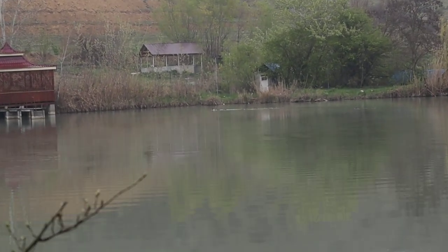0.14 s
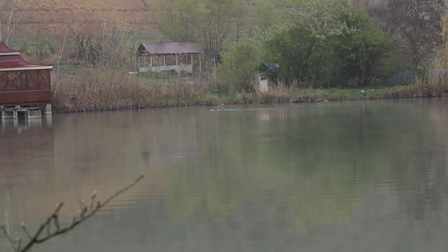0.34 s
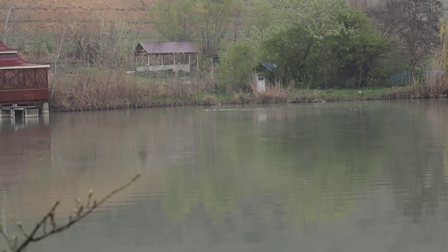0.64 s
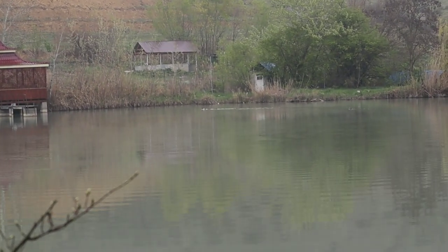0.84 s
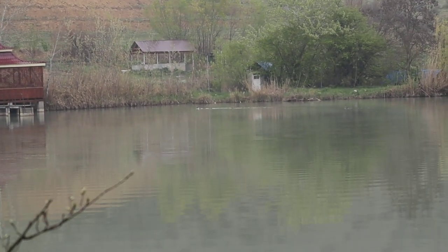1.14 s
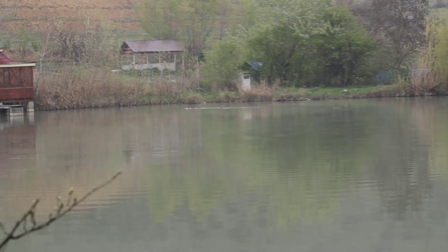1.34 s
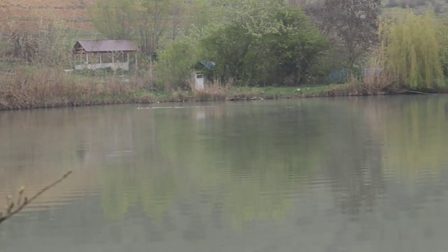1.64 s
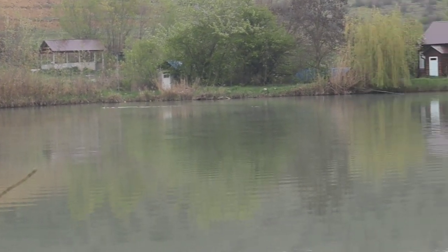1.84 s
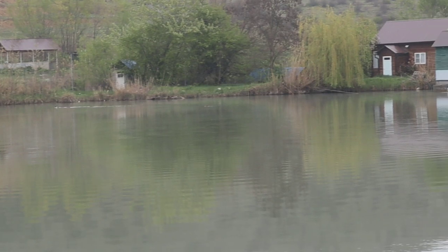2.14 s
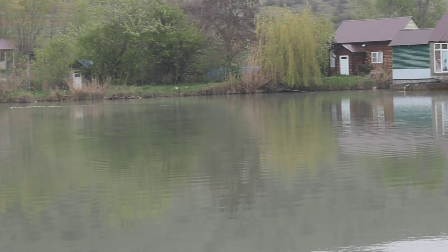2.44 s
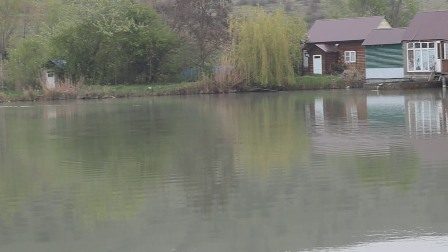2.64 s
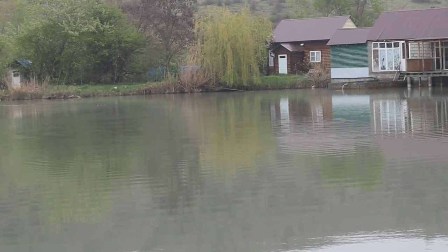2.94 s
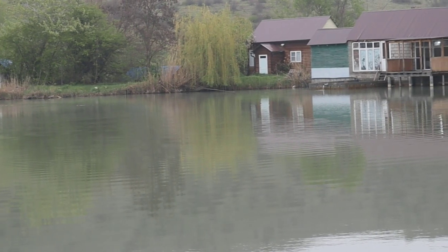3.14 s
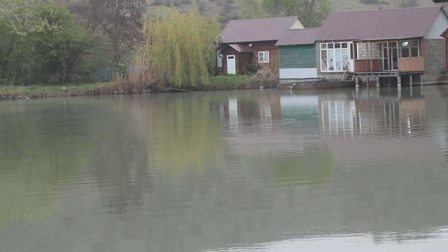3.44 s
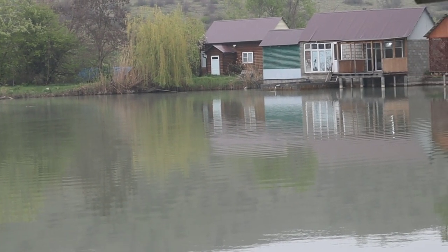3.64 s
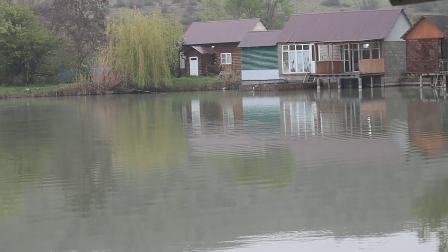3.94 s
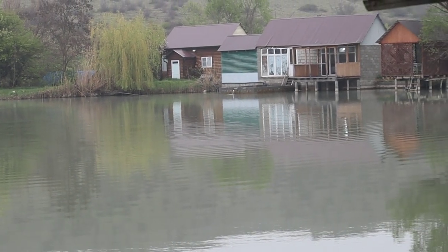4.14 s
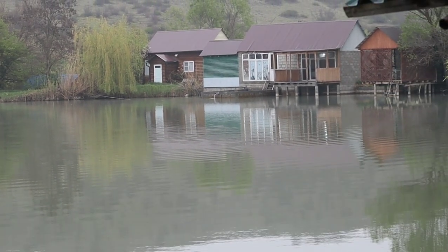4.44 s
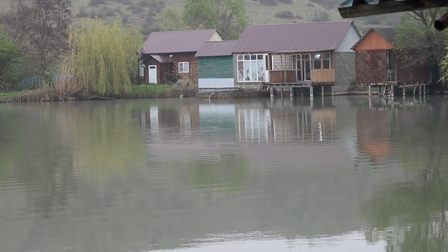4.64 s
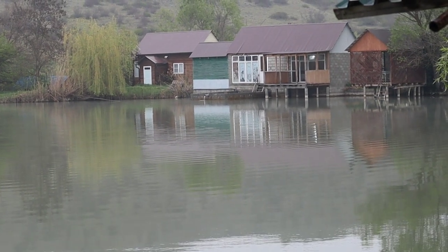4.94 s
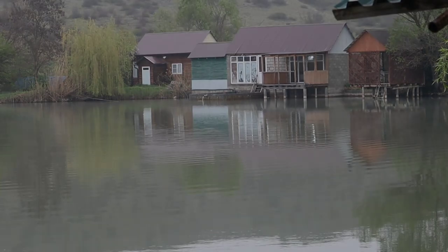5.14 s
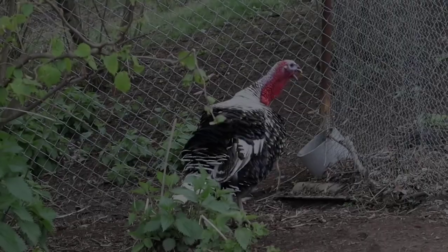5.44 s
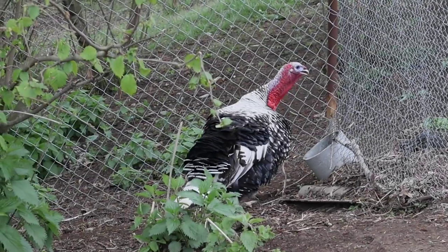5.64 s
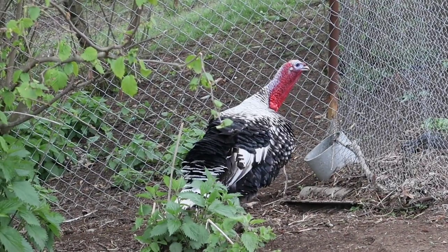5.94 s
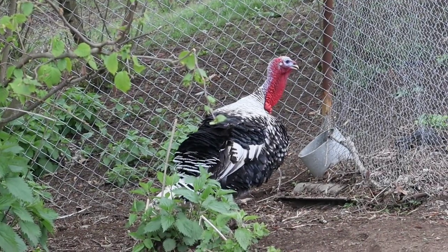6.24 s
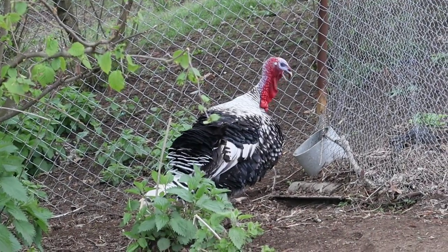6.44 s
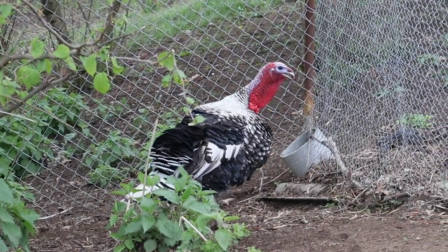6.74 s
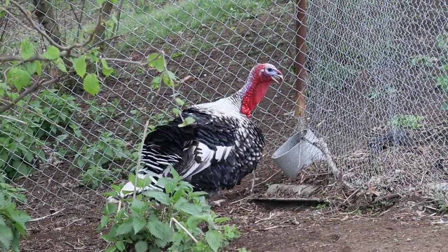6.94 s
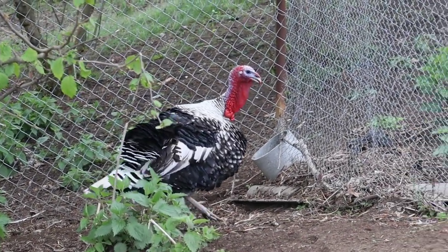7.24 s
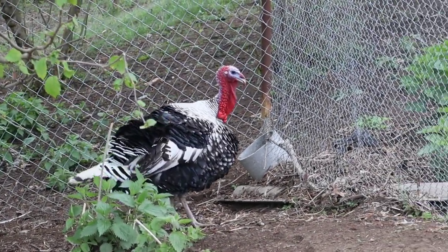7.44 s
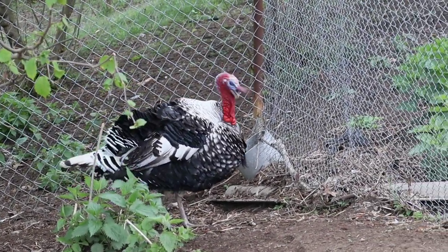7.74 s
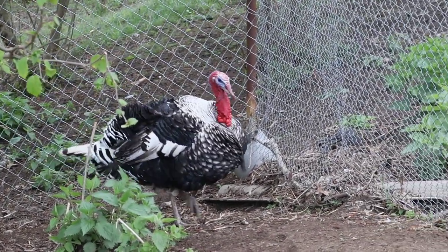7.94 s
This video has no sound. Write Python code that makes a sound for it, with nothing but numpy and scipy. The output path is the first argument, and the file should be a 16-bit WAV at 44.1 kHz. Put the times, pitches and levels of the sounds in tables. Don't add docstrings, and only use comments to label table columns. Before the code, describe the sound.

From 0 to about 5.3 seconds there is soft lakeside air, very quiet, on a hand-held camera. Four faint nasal duck quacks come in the first 1.1 seconds, among tiny high chirps and a dull knock at 0.3. Sparse chirps follow, with low handling bumps and a bright tick near 2.8. Two clearer distant quacks come at 3.2 and 3.6. From 4.65 a quick small-bird trill leads to a clear falling note at 4.9 and a higher note at 5.1 as the air fades. At 5.4 turkeys erupt close by: buzzy, whistling gobbles and a short yelp, rapid until 6.1. Low clucks follow at 6.2 and 6.3. A louder, rougher burst runs from 6.4 to 7.0, with a warbling yelp around 6.5, growls and peeps, slightly echoing. A soft purr and peeps end near 7.2, then faint pen air, dry ticks and low handling bumps until 8.

```python
import sys
import numpy as np
from scipy import signal
from scipy.fft import rfft, irfft, next_fast_len
from scipy.io import wavfile
from scipy.ndimage import uniform_filter1d

SR = 44100
rng = np.random.default_rng(int(sys.argv[2]) if len(sys.argv) > 2 else 0)


def transcribe(u):
    v = np.clip(np.atleast_2d(u).T, -1, 1)
    q = np.round(v * 32767).astype(np.int16)
    wavfile.write(sys.argv[1], SR, q)


def makeup_ratio(level_db):
    decades = np.asarray(level_db, float) / 20
    return 10 ** decades


N = 357121
T = np.arange(N) / SR
SCENE_CHANGE_S = 5.372

# f/Hz, width/Hz, level/dB
WINDPIPE = [(595, 145, -5), (1150, 112, -3), (1510, 870, -11), (2200, 620, -10), (2925, 97, -2),
            (3610, 71, -2.5), (4400, 255, -10), (5050, 73, -7), (5670, 96, -11), (6500, 290, -21),
            (7300, 240, -20.5), (8700, 610, -22.5), (12000, 3500, -35)]


def curve(rows):
    s, *columns = np.transpose(rows)
    return [np.interp(T, s, c) for c in columns]


def wander(hz):
    x = signal.lfilter(*signal.butter(2, hz, fs=SR), rng.standard_normal(N))
    return x / x.std()


def add(out, start_s, x):
    i = int(start_s * SR)
    out[i:i + len(x)] += x[:N - i]


def sine(hz):
    return np.sin(2 * np.pi * np.cumsum(hz) / SR)


def response(hz, throat):
    total = 0
    for k, (centre_hz, width_hz, db) in enumerate(throat):
        total = total + (-1) ** k * makeup_ratio(db) / (1 + 2j * (hz - centre_hz) / width_hz) ** 1.233
    return total


def ring(x, throat):
    hz = np.arange(2049) * SR / 4096
    radiation = (1j * hz / (140 + 1j * hz)) ** 3
    return signal.oaconvolve(x, irfft(response(hz, throat) * radiation))[:N]


def glide(length_s, first_hz, last_hz, bend, attack, edge):
    u = np.linspace(0, 1, int(length_s * SR))
    swell = np.where(u < attack, u / attack, (1 - u) / (1 - attack))
    hz = last_hz + (first_hz - last_hz) * (1 - u) ** bend
    return hz, np.sin(np.pi / 2 * swell) ** edge


def stack(start_s, hz, swell, throat, tilt_db, rough, shake, soft_db=4.5, half_db=-60, spread=0):
    i = int(start_s * SR)
    pitch_noise, size_noise, breath = shake[:, i:i + len(hz)]
    k = np.arange(1, int(17500 / hz.max()))[:, None]
    octave_db = tilt_db - soft_db * (1 - swell / swell.max())
    source = makeup_ratio(octave_db * np.log2(k))
    phase = 2 * np.pi * np.cumsum(hz * (1 + 0.26 * rough * pitch_noise)) / SR
    pulses = (source * np.cos(k * phase - spread * k ** 2)).sum(axis=0)
    pulses *= 1 + 0.9 * rough * size_noise
    pulses += makeup_ratio(half_db) * np.cos(phase / 2)
    top = (source * abs(response(k * hz, throat)))[:, np.argmax(swell)].max()
    return -swell * (pulses + rough * breath * (1 + np.cos(phase))) / top


def syllables(table, throat, shake, end, tilt_db, attack, edge, half_db=-60, soft_db=5.0, spread=0):
    out = np.zeros(N)
    for s, length_s, first_hz, db, rough in table:
        hz, swell = glide(length_s, first_hz, end * first_hz, 1.0, attack, edge)
        add(out, s, makeup_ratio(db) * stack(s, hz, swell, throat, tilt_db, rough, shake, soft_db, half_db, spread))
    return ring(out, throat)


def held(rows, throat, shake, tilt_db, soft_db, fall_db, rough):
    start_s = rows[0][0]
    span = (T > start_s) & (T < rows[-1][0])
    hz, db = (uniform_filter1d(c, size=220)[span] for c in curve(rows))
    swell = makeup_ratio(db) * signal.windows.tukey(len(hz), .15)
    soft_db = soft_db + fall_db * (1 - hz / np.maximum.accumulate(hz))
    out = np.zeros(N)
    out[span] = stack(start_s, hz, swell, throat, tilt_db, rough, shake, soft_db)
    return ring(out, throat)


def first_turkey(shake):
    # t/s, length/s, first f/Hz, level/dB, roughness/0-1
    gobble = [(5.366, 0.067, 676, -54.5, 0.4), (5.408, 0.026, 787, -35, 0.25),
              (5.463, 0.034, 765, -29, 0.36), (5.638, 0.027, 720, -25.5, 0.54),
              (5.694, 0.019, 729, -21, 0.4), (5.802, 0.022, 730, -18.5, 0.34),
              (5.856, 0.025, 713, -19, 0.28), (5.904, 0.037, 776, -40, 0.14),
              (6.004, 0.028, 751, -19, 0.33), (6.45, 0.015, 717, -22, 0.1),
              (6.588, 0.021, 780, -14.5, 0.16), (6.698, 0.016, 808, -17, 0.26),
              (6.749, 0.018, 772, -18, 0.38), (6.94, 0.023, 664, -11.5, 0.24)]
    return syllables(gobble, WINDPIPE, shake, end=.87, tilt_db=-5.5, attack=0.35, edge=1.44)


def second_turkey(shake):
    # t/s, length/s, first f/Hz, level/dB, roughness/0-1
    answer = [(5.776, 0.032, 524, -11.5, 0.34), (5.79, 0.013, 510, -15.5, 0.43),
              (5.812, 0.016, 518, -33, 0.53), (5.872, 0.012, 490, -24, 1), (5.983, 0.012, 550, -25.5, .17),
              (5.996, 0.017, 523, -11.5, 0.2), (6.022, 0.011, 496, -16, 0.073),
              (6.438, 0.025, 525.4, -15, 0.45), (6.466, 0.023, 548, -23, 0.44),
              (6.664, 0.014, 565, -19.5, 0.42), (6.76, 0.0076, 577, -22, 0.11),
              (6.764, 0.013, 287, -37, 0.12), (6.916, 0.0102, 516, -13, 0.15),
              (6.934, 0.015, 540, -15, 0.43), (6.961, 0.014, 546, -13, 0.51),
              (6.97, 0.011, 532, -19.5, 0.68)]
    growls = [
        (6.068, 0.026, 346.3, -18.5, 0.53),
        (6.422, 0.029, 314.2, -23, 0.48),
        (6.596, 0.038, 303, -14, 0.35),
        (6.62, 0.05, 275.8, -10.5, 0.24),
    ]
    # f/Hz, width/Hz, level/dB
    chest = [(282, 480, -58), (556, 890, -8), (1064, 156, 14), (1780, 190, 6), (2150, 120, 2),
             (2850, 240, -2), (3730, 530, -6), (4900, 230, -18), (6000, 1600, -21), (8700, 2600, -44),
             (12100, 2600, -33)]
    stretched = [(570, 600, -9), (1095, 115, 14), (1767, 200, -3), (2100, 200, -4), (3030, 100, 2),
                 (3600, 160, -8), (4430, 120, -3), (6300, 900, -18), (8700, 1500, -28), (12500, 2000, -33)]
    shake = np.roll(shake, SR, axis=1)
    out = syllables(answer, chest, shake, end=1.015, tilt_db=-6.5, attack=0.4, edge=0.49,
                    half_db=-4, soft_db=17)
    out += syllables(growls, stretched, shake, end=1.015, tilt_db=-2.5, attack=0.51, edge=0.54, spread=.05)
    return out


def peeps(shake):
    # t/s, first f/Hz, last f/Hz, level/dB, octave level/dB
    heads = [
        (5.397, 2150, 1187, -34, -11),
        (5.455, 2475, 1159, -25, -9),
        (5.491, 1510, 1290, -20.5, -8.5),
        (5.626, 1997, 1030, -23.5, -10),
        (5.683, 2515, 1162, -20.5, -23),
        (5.845, 1490, 984, -19.5, -13),
        (5.9, 2670, 1144, -15.5, -11.5),
        (5.913, 1406, 1194, -27, -6.5),
        (6.053, 2056, 954, -22, -7),
        (6.681, 1544, 1270, -19, -2),
    ]
    # t/s, length/s, first f/Hz, last f/Hz, level/dB
    between_peeps = [(5.481, 0.015, 995, 1185, -23), (5.656, 0.011, 1300, 1020, -26),
                     (5.875, 0.017, 1230, 1260, -31), (6.091, 0.028, 1860, 2200, -23),
                     (6.11, 0.016, 3010, 3020, -34.5), (6.441, .013, 1040, 1140, -15),
                     (6.448, 0.018, 1230, 1473, -15), (6.712, 0.013, 1140, 1080, -17),
                     (6.736, 0.014, 2600, 2410, -24.5), (6.744, .012, 1760, 1153, -14),
                     (6.966, 0.015, 986, 860, -16.5), (6.984, .024, 930, 900, -39),
                     (6.979, 0.033, 1436, 1500, -13), (7.158, 0.033, 1337, 1294, -25.5),
                     (7.178, 0.026, 1272, 1415, -24.5)]
    head_s, peep_octave_db = .028, -11
    third_db, overtone_fall_db = -5, -5
    rows = [(s, head_s, *rest) for s, *rest in heads]
    rows += [(*row, peep_octave_db) for row in between_peeps]
    out, upper = np.zeros((2, N))
    for s, length_s, first_hz, last_hz, db, octave_db in rows:
        width = abs(np.log(first_hz / last_hz))
        hz, swell = glide(length_s, first_hz, last_hz, bend=1 + 5.5 * width,
                          attack=.3 + .3 * width, edge=.9 + 1.1 * width)
        pitch_noise, size_noise, breath = shake[:, int(s * SR):][:, :len(hz)]
        phase = 2 * np.pi * np.cumsum(hz * (1 + 0.12 * width * pitch_noise)) / SR
        tone = np.sin(phase) + swell * makeup_ratio(octave_db) * np.sin(2 * phase)
        tone = tone * (1 + 0.098 * width * size_noise) + 0.14 * width * breath
        add(out, s, makeup_ratio(db) * swell * tone)
        overtones = sum(makeup_ratio(overtone_fall_db * k) * np.sin((k + 3) * phase) for k in range(4))
        add(upper, s, makeup_ratio(db + third_db) * width * swell * overtones)
    return 0.87 * out + ring(0.18 * out + 1.47 * upper, WINDPIPE)


def yelps(shake):
    # t/s, f/Hz, level/dB
    yelp = [
        (5.516, 725, -20.5),
        (5.535, 740, -21.5),
        (5.55, 762, -21),
        (5.576, 806, -22),
        (5.594, 760, -24),
        (5.602, 684, -23),
        (5.617, 630, -33),
    ]
    warble = [
        (6.478, 839, -22),
        (6.496, 924, -12),
        (6.512, 755, -14),
        (6.53, 892, -11.5),
        (6.545, 794, -13),
        (6.558, 853, -15),
        (6.572, 834, -13.5),
        (6.588, 1051, -5.5),
        (6.62, 970, -42),
    ]
    # f/Hz, width/Hz, level/dB
    open_beak = [(730, 470, 0), (1460, 126, 8.5), (2270, 600, 0.5), (3010, 280, 5.5), (3920, 440, -1),
                 (4860, 290, -6), (5430, 280, -8.5), (8000, 4000, -24), (15000, 4000, -35)]
    wide_beak = [(1040, 330, 9.5), (1616, 270, 9), (2400, 100, -3), (3460, 130, -5), (4080, 110, -9.5),
                 (5320, 370, -18), (8700, 240, -23), (12500, 1500, -61)]
    out = held(warble, wide_beak, shake, tilt_db=0.5, soft_db=-1.0, fall_db=4, rough=0.059)
    return out - held(yelp, open_beak, shake, tilt_db=1.5, soft_db=6, fall_db=120, rough=0.062)


def hen(shake):
    # t/s, length/s, first f/Hz, level/dB, roughness/0-1
    clucks = [
        (6.164, 0.03, 264, -23.5, 0.35),
        (6.286, 0.03, 269.2, -21.5, 0.35),
        (6.406, .0093, 258, -42, .4),
    ]
    purrs = [
        (6.842, 0.031, 206, -28.5, 0.15),
        (7.108, 0.031, 177.2, -30.5, 0.15),
    ]
    # f/Hz, width/Hz, level/dB
    hen_throat = [(373, 350, -9), (718, 197, 9), (2080, 280, -4), (2600, 71, -5.5), (3400, 280, -9),
                  (6700, 370, -22), (8150, 170, -20)]
    out = syllables(clucks, hen_throat, shake, end=.9, tilt_db=1.0, attack=0.33, edge=0.41)
    out += syllables(purrs, hen_throat, shake, end=.9, tilt_db=-1.0, attack=0.6, edge=0.92)
    return out


def breathing(voice, smear_s, db):
    flow = uniform_filter1d(abs(voice), size=int(smear_s * SR))
    return makeup_ratio(db) * ring(flow * rng.standard_normal(N), WINDPIPE)


def air_sac(voice):
    band = signal.butter(2, [58, 125], "band", fs=SR, output="sos")
    push = np.tanh(abs(voice) / 0.13) * 0.072
    return makeup_ratio(-3.5) * signal.sosfilt(band, push)


def ducks(shake):
    # t/s, length/s, first f/Hz, highest f/Hz, level/dB
    quacks = [
        (.132, .105, 280, 286, -47),
        (.378, .15, 264, 299, -45.5),
        (.67, .15, 291, 300, -45),
        (.975, .125, 264, 293, -45),
        (3.198, .165, 277, 338, -41),
        (3.566, .15, 270, 320, -41),
    ]
    # f/Hz, width/Hz, level/dB
    bill = [(1230, 240, -8), (1540, 240, -10), (2030, 200, 1), (2550, 350, -17)]
    roughness, sag = .05, .95
    out = np.zeros(N)
    for s, length_s, first_hz, top_hz, db in quacks:
        u = np.linspace(0, 1, int(length_s * SR))
        top = .15 + 3.2 * (top_hz / first_hz - 1)
        climb = first_hz + (top_hz - first_hz) * np.sin(np.pi / 2 * np.minimum(u / top, 1)) ** 1.9
        fall = top_hz * (1 - (1 - sag) * ((u - top) / (1 - top)) ** 2)
        hz = np.where(u < top, climb, fall)
        swell = glide(length_s, 1, 1, 1, attack=0.23, edge=0.11)[1]
        rough = roughness * (.5 + 2 * u)
        add(out, s, makeup_ratio(db) * stack(s, hz, swell, bill, tilt_db=-1, rough=rough, shake=shake))
    return ring(out, bill)


def birds(shake):
    # t/s, length/s, first f/Hz, level/dB
    chirps = [(.237, .009, 7300, -49), (.248, 0.018, 8600, -48.5), (.266, .008, 7000, -49),
              (.278, 0.025, 8250, -54), (.308, .008, 6200, -47), (.334, .007, 4400, -47),
              (.342, .006, 5740, -49), (.428, .008, 5100, -53), (1.652, 0.018, 8700, -53.5),
              (1.688, .013, 7050, -52), (2.328, 0.04, 8540, -59), (3.786, .04, 7800, -63),
              (4.942, 0.059, 8000, -59), (7.05, 0.035, 7800, -59)]
    level_notes = [
        (.04, .06, 7120, -59),
        (.1, .06, 6760, -61),
        (.386, .013, 4860, -52),
        (1.658, 0.02, 6880, -54),
        (.304, .006, 7600, -52),
        (6.3, 0.097, 4300, -58.5),
        (7.128, 0.09, 6000, -59),
    ]
    trill = [
        (4.731, 0.011, 2000, -49),
        (4.756, .012, 2060, -48),
        (4.782, 0.016, 2120, -46),
    ]
    rising = [
        (4.664, .011, 2450, -49),
        (4.682, 0.011, 2400, -47),
        (4.699, .014, 2400, -48),
        (4.721, 0.012, 2360, -50),
        (4.747, .013, 2370, -47),
        (4.868, 0.025, 2340, -44.5),
    ]
    out = np.zeros(N)
    for table, end, flutter in ((chirps, .76, .6), (level_notes, .995, .4), (trill, .86, .15),
                                (rising, 1.08, .15)):
        for s, length_s, first_hz, db in table:
            hz, swell = glide(length_s, first_hz, end * first_hz, 1.0, attack=0.38, edge=0.17)
            wobble = 1 + flutter * (-db - 32) / 16 * shake[int(s * SR):][:len(hz)]
            add(out, s, makeup_ratio(db) * swell * wobble * sine(hz * (1 + 0.011 * (wobble - 1))))
    return out


def songbird():
    # t/s, f/Hz, level/dB
    song_notes = [
        [(4.873, 1780, -52), (4.886, 2080, -42), (4.92, 2070, -40), (4.97, 1992, -40), (5.02, 1894, -42.5),
         (5.05, 1820, -48), (5.066, 1770, -49)],
        [(5.128, 3300, -60), (5.145, 3216, -47), (5.19, 3200, -43.5), (5.205, 3300, -50), (5.224, 3020, -53)],
        [(5.212, 2850, -56), (5.221, 2520, -49), (5.229, 2730, -56), (5.239, 2450, -52), (5.252, 2780, -51),
         (5.28, 2790, -60), (5.312, 2850, -68)],
    ]
    out, shiver = np.zeros(N), 1 + 0.21 * wander(90)
    for rows in song_notes:
        span = (T > rows[0][0]) & (T < rows[-1][0])
        hz, db = (uniform_filter1d(c, size=130)[span] for c in curve(rows))
        out[span] += makeup_ratio(db) * shiver[span] * signal.windows.tukey(len(hz), .1) * sine(hz)
    return out


def echoes(x, near, distant, top_hz):
    t, tail = T[:SR // 2], 0
    for delay_s, t60_s, db in (near, distant):
        shape = makeup_ratio(-60 * t / t60_s) * (1 - np.exp(-(t / delay_s) ** 2))
        tail = tail + makeup_ratio(db) * shape / np.linalg.norm(shape)
    scatter = signal.lfilter(*signal.butter(1, top_hz, fs=SR), tail * rng.standard_normal(len(t)))
    return x + signal.fftconvolve(x, scatter)[:N]


def ticks():
    # t/s, level/dB, f/Hz
    clicks = [
        (2.6304, -46, 2970),
        (2.762, -40, 2900),
        (2.8118, -30.5, 9000),
        (4.514, -35, 2450),
        (4.621, -35, 2900),
        (7.42, -36.5, 6100),
        (7.435, -38, 3210),
        (7.6819, -46, 3140),
        (7.9468, -37, 5170),
    ]
    # (f/Hz, level/dB, t60/s)
    knock_s, knock_db, modes = (.303, -31.5, [(261, 5, 0.11), (69.6, -9.5, .15)])
    out, t = np.zeros(N), T[:SR // 5]
    for s, db, hz in clicks:
        add(out, s, makeup_ratio(db + 5.0) * np.exp(-t / 0.00027) * np.cos(2 * np.pi * hz * t))
    for hz, db, t60_s in modes:
        swell = (1 - np.exp(-t / 0.0045)) * makeup_ratio(-60 * t / t60_s)
        add(out, knock_s, makeup_ratio(knock_db + db) * swell * np.sin(2 * np.pi * hz * t))
    return out


def rumble():
    # middle t/s, half length/s, level/dB
    jolts = [(0.297, 0.062, -57), (.65, 0.3, -55), (1.3, .25, -56), (1.697, 0.036, -50), (2.1, 0.073, -51),
             (2.32, 0.035, -56), (2.486, 0.042, -44), (2.64, 0.034, -45), (2.87, 0.081, -43.5),
             (3.18, .07, -57), (3.423, .05, -41), (3.82, 0.046, -56), (4.667, 0.085, -48),
             (6.25, 0.074, -52), (7.332, 0.074, -50), (7.54, 0.069, -39.5), (7.886, 0.11, -41)]
    resonance_hz, tremor_db = 26, -55.5
    gap = 1 - np.exp(-((T - SCENE_CHANGE_S) / 0.18) ** 2)
    size = makeup_ratio(tremor_db - 19 * (T > SCENE_CHANGE_S))
    for s, half_s, db in jolts:
        size = size + makeup_ratio(db) * np.exp(-((T - s) / half_s) ** 2)
    return np.sqrt(2) * gap * size * np.sin(2 * np.pi * resonance_hz * T + 0.53 * wander(3.7))


def air(spectrum, flicker_db):
    size = next_fast_len(N)
    f = np.maximum(np.arange(size // 2 + 1) * SR / size, 1)
    hz, db = np.transpose(spectrum)
    shaped = rfft(rng.standard_normal(size)) * makeup_ratio(np.interp(np.log(f), np.log(hz), db))
    out = 0
    for centre_hz in 2. ** np.arange(5, 15):
        share = np.clip(1 - abs(np.log2(f / centre_hz)), 0, 1)
        out = out + irfft(shaped * share, size)[:N] * makeup_ratio(flicker_db * wander(14.0))
    return out / out.std()


def lake_air():
    # f/Hz, level/dB per Hz
    lake_spectrum = [(26, -41), (45, -4), (59, -11), (239, -7), (329, -7.5), (372, -11.5), (411, -12.5),
                     (2080, -17), (4570, -21.5), (8450, -27.5), (10000, -31), (14900, -32), (16000, -34)]
    fade_s = 0.51
    return makeup_ratio(-48.5) * np.clip((SCENE_CHANGE_S - T) / fade_s, 0, 1) * air(lake_spectrum, 1.12)


def pen_air(flock):
    # f/Hz, level/dB per Hz
    pen_spectrum = [(26, -62), (45, -5), (154, -22.5), (245, -12.5), (314, -22), (421, -23), (3660, -29),
                    (5560, -33), (7850, -33.5), (11100, -36), (16000, -37.5)]
    fade_s, dip_db, dip_s = 0.55, -3.5, 0.12
    loud = uniform_filter1d(abs(flock), size=int(dip_s * SR))
    level = makeup_ratio(-52 + dip_db * np.tanh(loud / 0.01))
    return level * np.clip((T - SCENE_CHANGE_S) / fade_s, 0, 1) * air(pen_spectrum, 1.4)


def scene():
    shake = np.array([wander(590), wander(250), wander(4800)])
    first, second = first_turkey(shake), second_turkey(shake)
    calls = yelps(shake)
    flock = first + second + hen(shake) + calls + peeps(shake)
    flock += breathing(first + 0.17 * second + 0.31 * calls, smear_s=0.058, db=7.5)
    pen = echoes(flock, (.006, .15, -16.5), (.04, .7, -24.5), top_hz=8000)
    pen += air_sac(first + second)
    far = echoes(makeup_ratio(-1.0) * ducks(2 * shake), (.01, .1, -8), (.04, .35, -7), top_hz=4070)
    far += echoes(birds(wander(190)), (.008, .1, -7), (.03, .3, -16), top_hz=11000)
    far += echoes(songbird(), (.008, .06, -14), (.03, .25, -22), top_hz=8000)
    return (pen + far + ticks() + rumble() + lake_air() + pen_air(flock))[None]


def band_limit(x):
    return signal.sosfilt(signal.butter(12, 16450, fs=SR, output="sos"), x)


def record(dry):
    top_cut = signal.ellip(10, .2, 80, 15800, fs=SR, output="sos")
    mix = signal.sosfilt(top_cut, 1.032 * np.tanh(dry / 0.83))
    return band_limit(mix)


dry = scene()
out = record(dry)
transcribe(out)
```